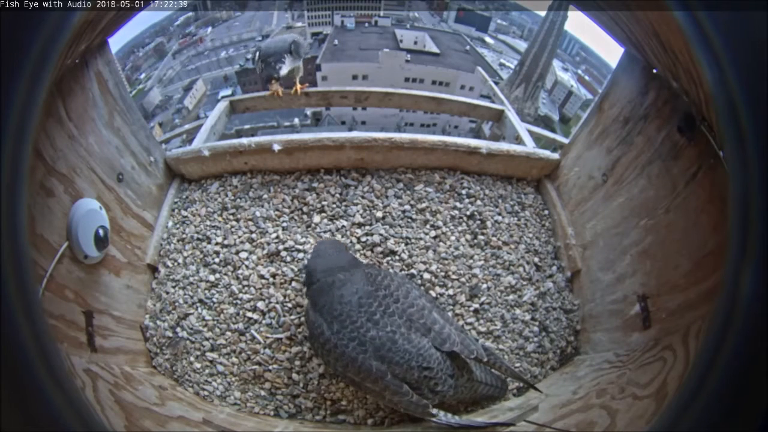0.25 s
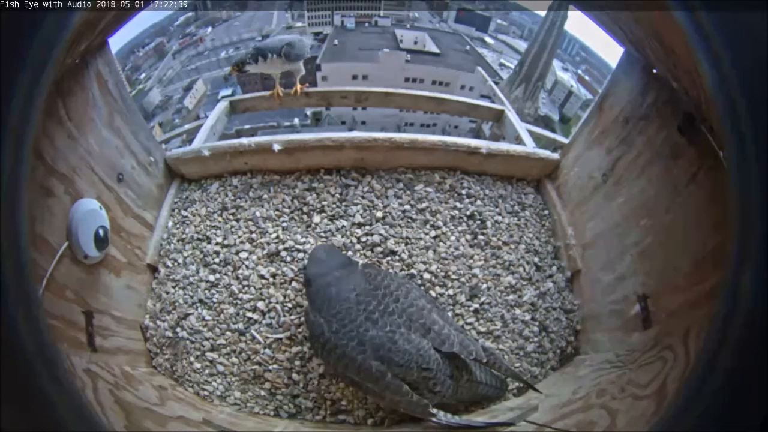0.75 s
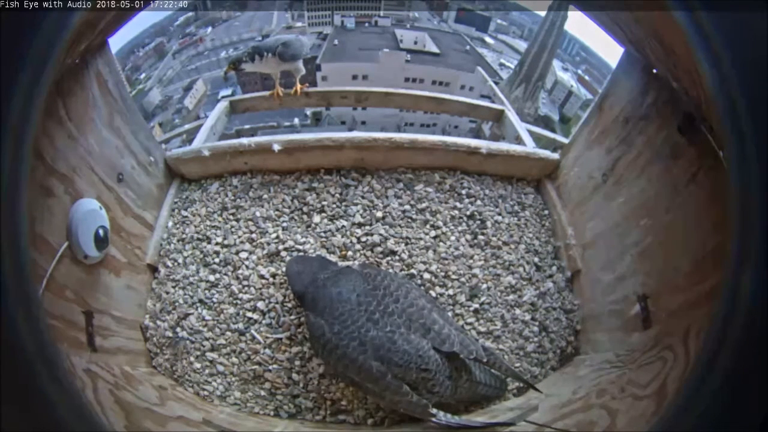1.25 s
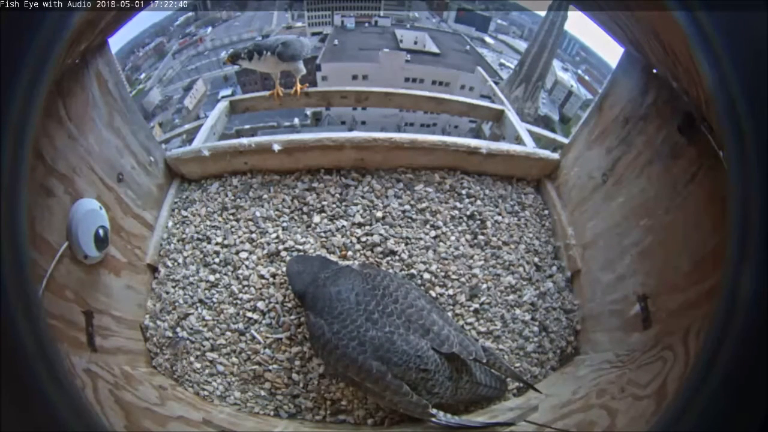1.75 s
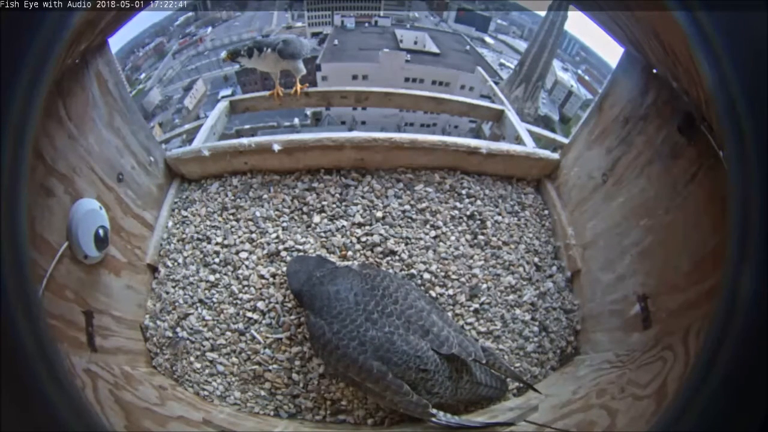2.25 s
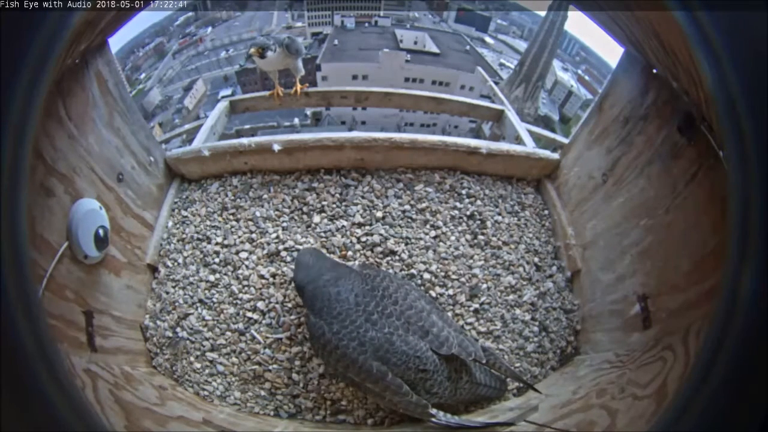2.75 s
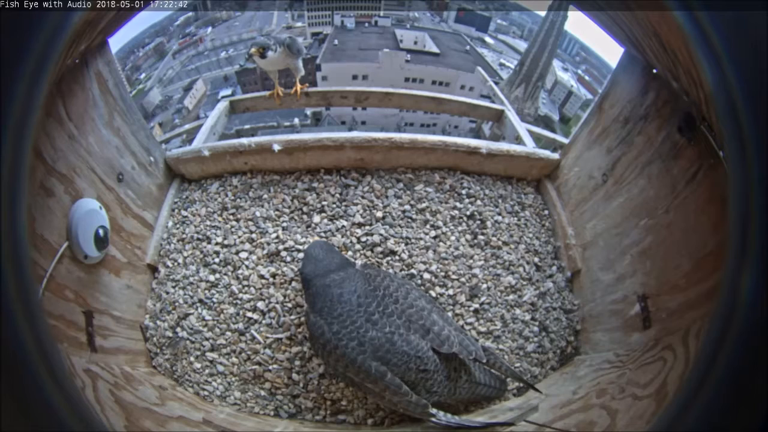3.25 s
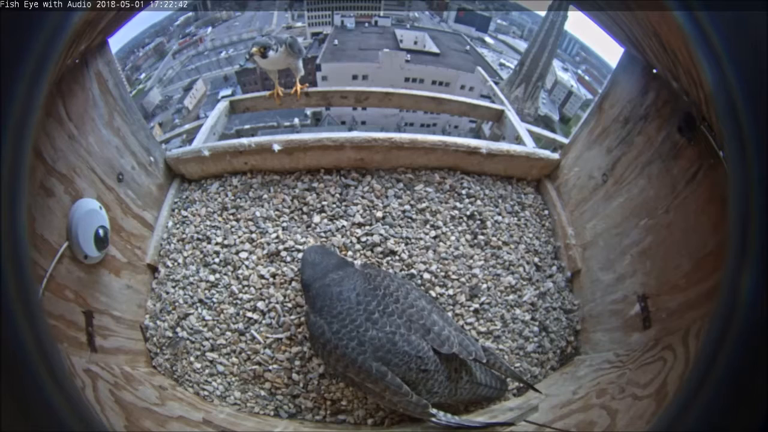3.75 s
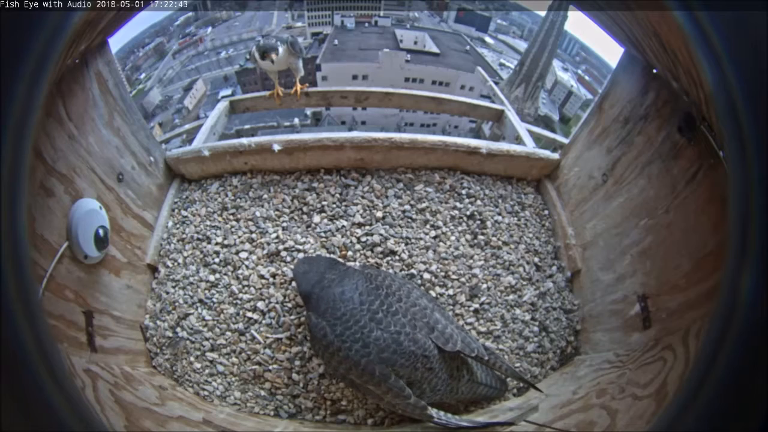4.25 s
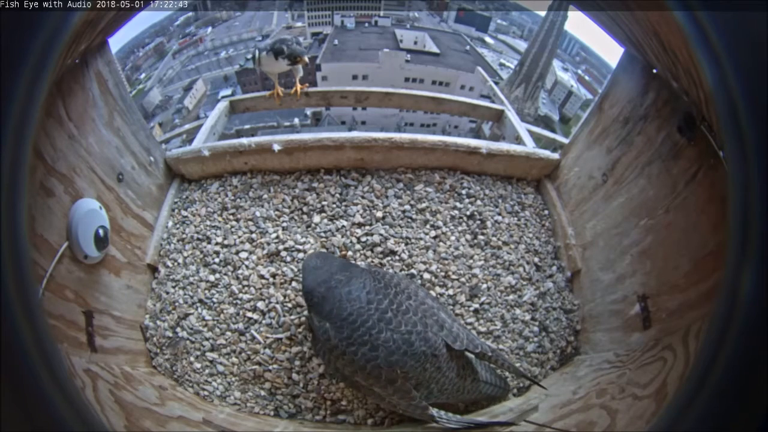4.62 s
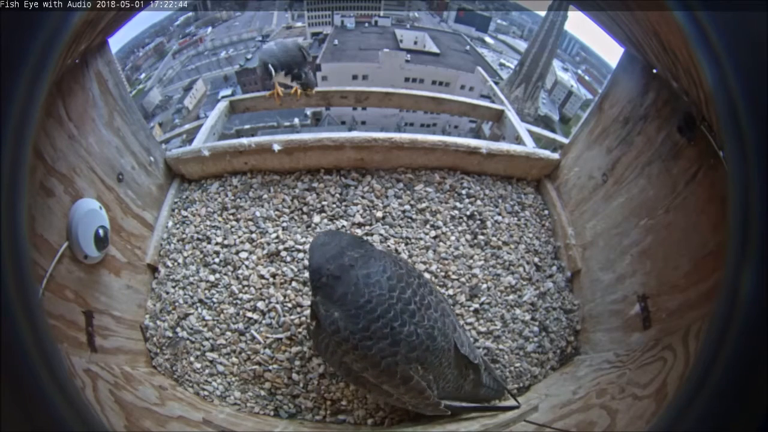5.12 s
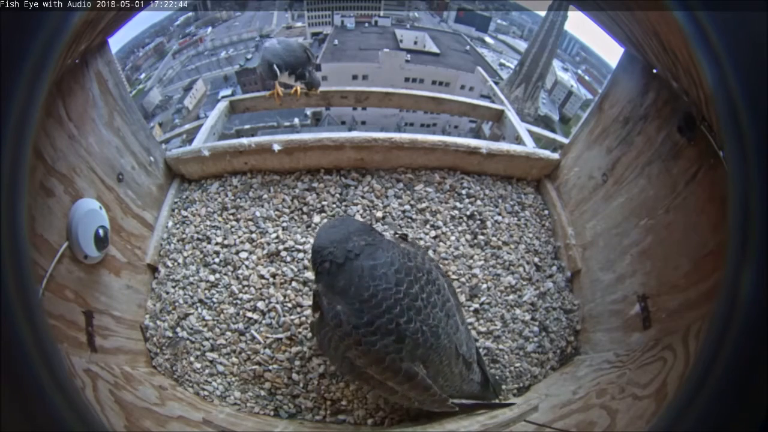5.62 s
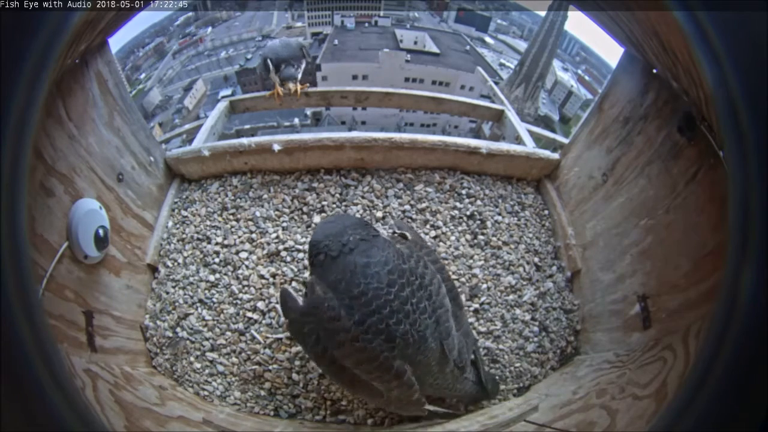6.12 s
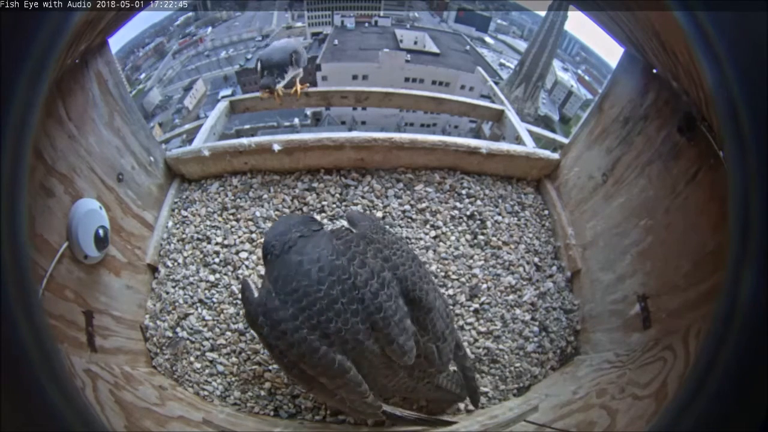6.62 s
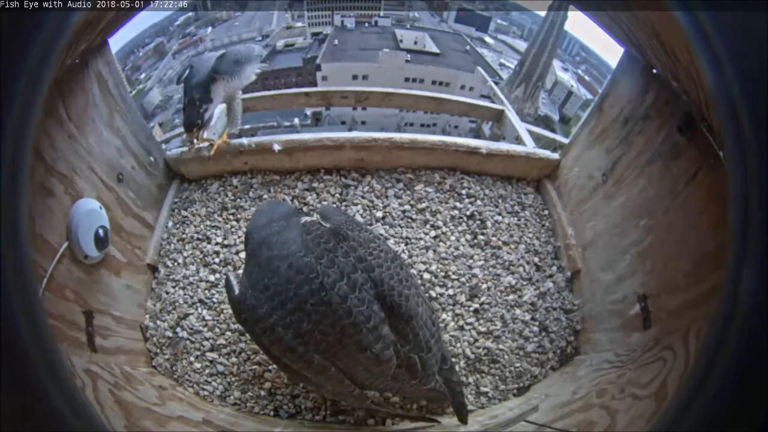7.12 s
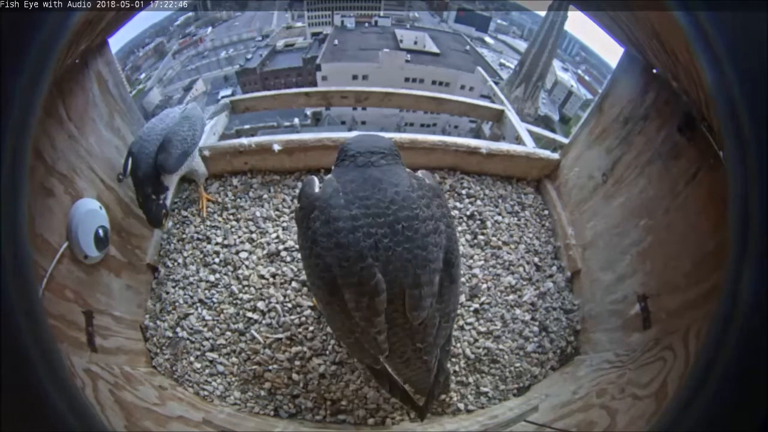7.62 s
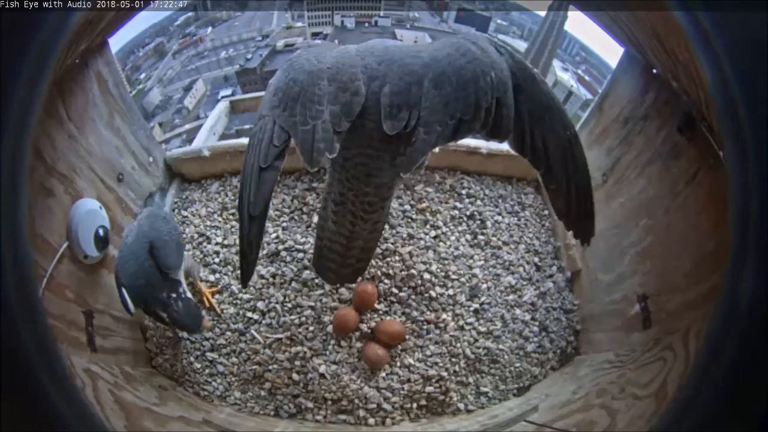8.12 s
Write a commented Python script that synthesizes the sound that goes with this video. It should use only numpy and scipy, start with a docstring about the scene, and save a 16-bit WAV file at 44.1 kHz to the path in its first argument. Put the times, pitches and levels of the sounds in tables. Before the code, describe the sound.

Raspy falcon clucks and sharp chirps, spaced at first, build into piercing, overloaded squeals in a small box above faint traffic roar.

```python
"""Two falcons greet in a wooden nest box on a tall building, over a city roar of coloured noise and engine tones.
Clucks (pulsed overtone stacks), short chirps and harsh rasps of puffed noise begin at once; the first held
whistle, a few gliding partials, comes half a second in. Feathers rustle as grainy noise from about 3 s, and
two pebbles tick near 4 and 4.7 s. From about 5.2 s whistles also break up to 6-7 kHz, on to the end.
A close, narrow-band camera microphone overloads on the loudest notes."""
import sys
import numpy as np
from scipy import signal
from scipy.fft import rfft, irfft, next_fast_len
from scipy.io import wavfile
from scipy.ndimage import map_coordinates

SR = 44100
rng = np.random.default_rng(int(sys.argv[2]) if len(sys.argv) > 2 else 0)


def generate_wav(sig):
    """Save sig (samples, or channels by samples) to the path in sys.argv[1] as 16-bit PCM at SR."""
    pcm = np.round(np.clip(np.atleast_2d(sig).T, -1, 1) * 32767).astype(np.int16)
    wavfile.write(sys.argv[1], SR, pcm)


N = 369116  # length in samples
BAND_HZ, TOP_HZ = 7750, 16000  # microphone band edge, top of the finished sound


def amp(db):
    """Decibels to gain."""
    return 10 ** (np.asarray(db) / 20)


def unit(x):
    """Scaled to rms 1."""
    return x / np.sqrt(np.mean(x ** 2) + 1e-20)


def along(points, hz):
    """Levels read from (frequency_hz, level_db) points on a log frequency axis."""
    point_hz, level_db = np.transpose(points)
    return np.interp(np.log(hz + 1), np.log(point_hz + 1), level_db)


def curves(rows, t):
    """Each column after the time, read at times t."""
    times, *columns = np.transpose(rows)
    return [np.interp(t, times, column) for column in columns]


def wobble(rate, size=N):
    """A smooth random curve, rate knots a second."""
    knots = rng.standard_normal(max(int(size * rate / SR) + 4, 600))
    return map_coordinates(knots, [np.arange(size) * rate / SR])


def filtered(x, response):
    """x times a response of frequency, padded so that its end does not wrap round."""
    padded = next_fast_len(N + SR // 2)
    hz = np.fft.rfftfreq(padded, 1 / SR)
    return irfft(rfft(x, padded) * response(hz), padded)[:N]


def hiss(spectrum, puffs=1):
    """Coloured noise of rms 1; puffs modulates the air before it is coloured."""
    air = puffs * rng.standard_normal(N)
    return unit(filtered(air, lambda hz: amp(along(spectrum, hz))))


def note(rows, attack, release, jitter):
    """Start sample, pitch, levels, phase and on-off gate of one note; the pitch trembles by the share jitter."""
    start, stop = max(rows[0][0], 0), rows[-1][0]
    t = np.arange(start, stop + release, 1 / SR)
    pitch, *levels = curves(rows, t)
    trembling = pitch * (1 + jitter * wobble(300, size=len(t)))
    phase = 2 * np.pi * np.cumsum(trembling) / SR
    fade_in = np.clip((t - start) / attack, 0, 1)
    fade_out = np.clip((stop + release - t) / release, 0, 1)
    gate = np.sqrt(2) * fade_in * fade_out  # a sine of gain 1 then has rms 1
    return round(start * SR), pitch, levels, phase, gate


def shaped(start, first, second, pitch_hz, partials_db, peak_s, swell_db, fade_db):
    """Rows (time_s, pitch_hz, level_db per partial) of a note whose pitch turns once and level peaks once."""
    times = [start, start + first, start + first + second]
    at = np.sort([*times, peak_s + 1e-6])  # the nudge keeps a peak at the turn distinct
    shape_db = np.interp(at, [start, peak_s, times[2]], [-swell_db, 0, -fade_db])
    levels_db = shape_db[:, None] + np.array(partials_db)
    return np.column_stack([at, np.interp(at, times, pitch_hz), levels_db])


def whistled(notes):
    """Nearly pure partials; each flickers on its own and a fast tremble spreads a rough halo round it."""
    out = np.zeros(N + SR)
    for rows in notes:
        at, pitch, levels, phase, gate = note(rows, attack=.0025, release=.003, jitter=.006)
        size = len(gate)
        rough = pitch / 35000 + .3 * np.exp(-size / SR / .05)  # high and short forced notes are hoarser
        for k, db in enumerate(levels, 1):
            flicker = amp(2.0 * wobble(120, size=size)) + rough * wobble(700, size=size)
            in_band = k * pitch < BAND_HZ + 400
            out[at:][:size] += gate * amp(db) * flicker * np.sin(k * phase) * in_band
    return out[:N]


# Held whistles: start_s, to_turn_s, after_turn_s, start_hz, turn_hz, end_hz,
# then level_db of each partial (rms at the loudest point, before flicker)
WHISTLE_NOTES = [ (.487, .055, .103, 1860, 1765, 1920, -22, -37, -27, -30),
                 (.645, .025, .01, 3110, 3440, 3020, -24, -26),
                 (1.205, .045, .105, 1886, 1855, 2060, -26, -22, -24, -33),
                 (1.345, .065, .015, 3170, 3345, 3020, -25, -23),
                 (1.788, .142, .025, 1690, 1846, 1990, -23, -31, -29, -35),
                 (2.998, .032, .15, 1890, 1755, 1890, -25, -36, -26, -34),
                 (4.24, .075, .015, 1680, 1960, 1560, -25, -31, -30, -29),
                 (4.33, .012, .013, 1545, 1420, 1295, -26),
                 (4.735, .035, .025, 2139, 2136, 1977, -17, -24, -35),
                 (5.33, .08, .02, 1650, 2033, 2050, -25, -34, -32, -33),
                 (5.725, .035, .065, 2303, 2133, 2323, -22, -23, -29),
                 (5.887, .015, .018, 794, 805, 819, -59, -26, -31, -33, -27, -24),
                 (6.315, .02, .02, 2707, 2698, 2660, -25, -12), (6.34, .01, .01, 4470, 4150, 3830, -22),
                 (6.34, .01, .01, 7200, 6880, 6570, -18), (6.476, .014, .02, 3620, 4420, 4390, -28),
                 (6.48, .02, .02, 6010, 5950, 5890, -34), (6.512, .028, .02, 4290, 4780, 4700, -26),
                 (7.033, .018, .019, 6010, 5975, 5940, -19), (7.085, .012, .013, 7400, 7500, 7600, -28),
                 (7.473, .008, .009, 6150, 6195, 6240, -22), (7.53, .07, .06, 3560, 4200, 4350, -23, -45),
                 (7.64, .01, .012, 4300, 4400, 4500, -22), (8.32, .01, .038, 3860, 4240, 4100, -24), ]
WAIL_PEAK_SHARE, WAIL_SWELL_DB, WAIL_FADE_DB = .3, 4, 7  # loudest this far in; softer by these at start and end


def wails():
    """Held whistles whose pitch bends once while the level peaks early in their length."""
    notes = []
    for start, first, second, *rest in WHISTLE_NOTES:
        peak_s = start + WAIL_PEAK_SHARE * (first + second)
        notes.append(shaped(start, first, second, rest[:3], rest[3:], peak_s, WAIL_SWELL_DB, WAIL_FADE_DB))
    return whistled(notes)


# Short forced chirps: start_s, rise_s, fall_s, start_hz, peak_hz, end_hz,
# then level_db of each partial (rms at the peak, before flicker)
CHIRP_NOTES = [ (.003, .027, .003, 1920, 1600, 1564, -19, -26, -25, -23),
               (.681, .003, .011, 1730, 1722, 1692, -11, -21, -5, -20),
               (1.423, .008, .009, 1888, 1876, 1830, -17, -14, -10, -19),
               (1.96, .003, .015, 1746, 1715, 1556, -13, -28, -17, -31),
               (2.715, .025, .02, 1862, 1940, 1496, -40, -28, -36, -28),
               (3.18, .014, .003, 1870, 1580, 1522, -18.5, -28, -28, -34),
               (3.44, .02, .03, 1910, 2115, 1970, -42, -32, -38),
               (3.648, .027, .015, 1728, 2084, 1773, -21, -28, -26, -30),
               (3.685, .003, .022, 1804, 1775, 1550, -18, -19, -15, -24),
               (3.88, .02, .03, 2015, 2090, 1760, -60, -28, -39, -35),
               (4.768, .003, .014, 3474, 3430, 3218, -14, -10),
               (4.8, .003, .022, 1684, 1630, 1260, -18, -31, -35), (5.19, .01, .01, 6320, 6320, 5900, -11),
               (5.2, .003, .02, 4100, 4020, 3500, -14.5, -20),
               (5.445, .003, .005, 2896, 2875, 2838, -11, -29),
               (5.45, .003, .017, 1781, 1780, 1770, -10, -22, -9, -12),
               (5.47, .003, .02, 1450, 1445, 1410, -18, -26),
               (5.612, .018, .03, 4270, 4480, 3380, -20, -34), (5.613, .003, .029, 5870, 5950, 6700, -18),
               (5.693, .003, .014, 1366, 1378, 1430, -19, -21),
               (5.805, .008, .02, 1943, 1800, 1742, -11, -20, -17, -23),
               (5.825, .015, .01, 6360, 6200, 6250, -10), (5.846, .013, .003, 6200, 6560, 6640, -3.5),
               (5.862, .004, .008, 7130, 6950, 6610, -5), (5.872, .008, .005, 6610, 6385, 6440, -1),
               (5.958, .003, .035, 6400, 6450, 6650, -24), (5.995, .005, .012, 4900, 3875, 3443, -4),
               (6.005, .012, .013, 2680, 2540, 2283, -10, -4, -20),
               (6.542, .035, .003, 6430, 6530, 6540, -18.5), (6.575, .01, .01, 3885, 3644, 3690, -13, -8),
               (6.585, .008, .017, 2464, 2300, 2266, -13, -4, -12),
               (6.878, .017, .06, 4400, 4450, 3350, -14, -22), (6.875, .012, .018, 6600, 6480, 6500, -13),
               (6.885, .003, .02, 2750, 2745, 2710, -35, -22), (6.89, .003, .007, 7270, 7160, 6900, -11.5),
               (7.0, .02, .04, 3700, 4350, 4700, -27), (7.112, .006, .012, 3790, 3735, 3560, -6, -5),
               (7.126, .003, .011, 2394, 2382, 2340, -12, -6, -11),
               (7.478, .027, .02, 4330, 4030, 3530, -14, -27), (7.648, .012, .03, 6150, 6350, 6550, -16),
               (7.7, .007, .009, 4010, 3900, 4126, -6, -26),
               (7.713, .008, .019, 2620, 2570, 2420, -30, -5, -14),
               (7.724, .003, .013, 4050, 3970, 3630, -8, -14), (8.07, .003, .017, 6230, 6090, 5300, -22),
               (8.088, .003, .009, 3770, 3715, 3550, -29, -31), (8.172, .02, .013, 6970, 6660, 5200, -12), ]
CHIRP_SWELL_DB = 8  # softer by this at the start
CHIRP_FADE_DB, CHIRP_FADE_DB_PER_S = 6, 330  # lost in the fall, and more the longer it lasts


def chirps():
    """Short forced whistles, loudest at the turn of their pitch."""
    notes = []
    for start, rise, fall, *rest in CHIRP_NOTES:
        fade_db = CHIRP_FADE_DB + CHIRP_FADE_DB_PER_S * fall
        notes.append(shaped(start, rise, fall, rest[:3], rest[3:], start + rise, CHIRP_SWELL_DB, fade_db))
    return whistled(notes)


CLUCK_SWELL_DB = 5  # gained by the fundamental over the hold
CLUCK_DROP_S, CLUCK_DROP_DB, OVERTONE_DROP_DB = .008, 13, 15  # the sudden loss when the hold ends
CLUCK_FADE_DB, OVERTONE_FADE_DB = 11, 16  # lost over the tail
CLUCK_TAIL_S, CLUCK_REST_HZ = .024, 390
CLUCK_WAVER = .15  # random spread of the pitch after the hold, as a share


def clucked(start, hold, start_hz, held_hz, low_db, high_db):
    """Rows (time_s, pitch_hz, fundamental_db, overtones_db): swell, sudden drop, wavering tail."""
    times = start + np.cumsum([0, hold, CLUCK_DROP_S, CLUCK_TAIL_S / 2, CLUCK_TAIL_S / 2])
    waver = 1 + CLUCK_WAVER * rng.standard_normal(3)
    pitch = [start_hz, held_hz, *(waver * [held_hz, CLUCK_REST_HZ, CLUCK_REST_HZ])]
    low = low_db - np.cumsum([0, CLUCK_DROP_DB, CLUCK_FADE_DB / 2, CLUCK_FADE_DB / 2])
    high = high_db - np.cumsum([0, 0, OVERTONE_DROP_DB, OVERTONE_FADE_DB / 2, OVERTONE_FADE_DB / 2])
    return np.column_stack([times, pitch, [low_db - CLUCK_SWELL_DB, *low], high])


# Low clucks: start_s, hold_s, start_hz, held_hz (at the end of the hold), fundamental_db, overtones_db
CLUCK_NOTES = [ (.033, .02, 371, 364, -13.5, -27), (.226, .03, 422, 547, -32, -15),
               (.413, .034, 305, 410, -12, -19), (.452, .015, 500, 390, -19, -34),
               (.69, .025, 429, 400, -14, -23), (1.138, .04, 310, 390, -12, -18),
               (1.975, .008, 357, 340, -12, -24), (2.926, .032, 323, 400, -10, -16),
               (2.972, .02, 500, 420, -21, -34), (3.195, .008, 362, 335, -19, -21),
               (3.705, .008, 391, 360, -15, -27), (4.33, .008, 384, 345, -18, -28),
               (4.71, .008, 298, 360, -20, -21), (4.805, .006, 380, 340, -23, -30),
               (5.167, .008, 379, 476, -36, -21), (5.465, .012, 500, 430, -16, -21),
               (5.69, .016, 316, 380, -17, -23), (5.83, .012, 460, 375, -19, -29),
               (6.26, .018, 357, 450, -25, -20), (6.29, .015, 372, 370, -28, -21),
               (6.605, .022, 489, 400, -22, -26), (6.852, .012, 410, 460, -20, -19),
               (7.14, .022, 551, 420, -21, -28), (7.45, .008, 357, 400, -18, -25),
               (7.738, .005, 438, 380, -23, -28), (8.04, .018, 371, 480, -20, -22),
               (8.148, .015, 370, 500, -18, -20), ]
# Colour of the cluck's overtones: frequency_hz, relative_level_db
CLUCK_COLOUR = [(700, 0), (1000, -5), (1300, 0), (1750, -1), (2150, -13), (3600, -28), (4700, -17),
                (5800, -30), (6800, -22)]


def clucks():
    """Slow flaps of the membranes: a round fundamental under a pulsed stack of overtones."""
    out = np.zeros(N + SR)
    k = np.arange(2, 20)[:, None]  # overtone numbers
    for row in CLUCK_NOTES:
        at, pitch, (low_db, high_db), phase, gate = note(clucked(*row), attack=.007, release=.006, jitter=.02)
        shares = amp(along(CLUCK_COLOUR, k * pitch)) * (k * pitch < BAND_HZ)
        stack = np.sum(shares * np.sin(k * phase), axis=0) / np.sqrt(np.sum(shares ** 2, axis=0))
        uneven = amp(3 * wobble(250, size=len(gate)))
        fundamental = amp(low_db) * np.sin(phase)
        out[at:][:len(gate)] += gate * (fundamental + amp(high_db) * uneven * stack)
    return out[:N]


RASP_RANGE_DB = 42  # climbed in the rise, lost in the fall
THROAT_LINGERS = 1.6  # the throat's fall over the beak's
# Bursts of air rasping through the syrinx: peak_s, rise_s, fall_s (of the beak), throat_db, beak_db
RASP_BURSTS = [ (.024, .06, .06, -19.5, -25.5), (.236, .028, .014, -16, -18), (.258, .04, .03, -30, -25),
               (.428, .024, .06, -24, -35), (.664, .3, .03, -43, -35), (.692, .05, .055, -22, -22),
               (1.16, .036, .04, -28, -25.5), (1.412, .22, .02, -36, -24), (1.432, .04, .034, -24, -12),
               (1.796, .04, .1, -64, -41), (1.98, .11, .032, -26.5, -26.5), (2.948, .03, .06, -24, -30),
               (2.985, .1, .04, -40, -33), (3.184, .2, .05, -39, -32), (3.468, .04, .06, -48, -34.5),
               (3.688, .05, .045, -30, -19), (3.912, .045, .055, -48.5, -37), (4.325, .1, .06, -27, -21),
               (4.716, .02, .02, -36, -42), (4.784, .12, .055, -20.5, -14), (5.176, .02, .02, -24, -25),
               (5.436, .17, .02, -45, -25.5), (5.468, .06, .04, -24, -26), (5.64, .05, .065, -31.5, -24.5),
               (5.7, .025, .035, -18.5, -32), (5.808, .2, .05, -35, -22.5), (5.888, .25, .04, -25.5, -14),
               (6.008, .022, .04, -32, -8), (6.028, .04, .025, -23, -13), (6.324, .075, .09, -24, -22.5),
               (6.356, .03, .035, -36.5, -24), (6.52, .14, .08, -51, -36), (6.596, .032, .05, -18.5, -5.5),
               (6.864, .018, .018, -18, -23.5), (7.012, .035, .1, -45, -33), (7.14, .035, .04, -15, -8.5),
               (7.46, .02, .06, -24, -25), (7.608, .1, .12, -51.5, -32.5), (7.712, .032, .05, -50.5, -23),
               (7.74, .04, .035, -19.5, -21), (8.052, .022, .025, -23, -24), (8.16, .022, .04, -22, -21),
               (8.325, .026, .3, -48, -32), ]
# Throat colour of the air noise: frequency_hz, relative_density_db
THROAT_COLOUR = [(250, -20), (600, -3), (1000, 1), (2000, 1.5), (3200, -3.5), (4000, -41.5)]
# Beak colour of the air noise: frequency_hz, relative_density_db
BEAK_COLOUR = [(2600, -32.5), (3300, 2), (4000, -1.5), (4500, -18.5), (5000, 1), (7000, 3.5), (7600, -7.5)]


def rasp():
    """Turbulent air in coarse puffs that throat and beak share, each with its own colour."""
    t, throat, beak = np.arange(N) / SR, np.zeros(N), np.zeros(N)

    def burst(peak, rise, fall):
        """Gain climbing to 1 and falling again, straight in decibels."""
        return amp(-RASP_RANGE_DB * np.maximum((peak - t) / rise, (t - peak) / fall))

    for peak, rise, fall, throat_db, beak_db in RASP_BURSTS:
        throat += amp(throat_db) * burst(peak, rise, THROAT_LINGERS * fall)
        beak += amp(beak_db) * burst(peak, rise, fall)
    puffs = amp(3.5 * wobble(350))
    return throat * hiss(THROAT_COLOUR, puffs) + beak * hiss(BEAK_COLOUR, puffs)


def box(x):
    """The plywood walls answer with a short dense tail, and the air in the box rings at one low note."""
    t = np.arange(SR // 8) / SR
    tail = rng.standard_normal(len(t)) * amp(-60 * t / .045)  # 60 dB down in 45 ms
    walls = signal.fftconvolve(x, tail / np.linalg.norm(tail))[:N]
    wet = x + amp(-13) * walls
    mode_hz, width_hz = 375, 50

    def air_mode(hz):
        """The direct sound plus half a resonance."""
        loss = 1j * hz * width_hz
        return 1 + 0.5 * loss / (mode_hz ** 2 - hz ** 2 + loss)

    return filtered(wet, air_mode)


# Feathers shifting: time_s, level_db (before the grain)
FEATHER_LEVEL = [(3.2, -74), (3.4, -55), (5.3, -57.5), (6.1, -54.5), (6.9, -63), (7.3, -76.5)]


def feathers():
    """Feathers rustle as bright noise in uneven grains, slow swells and quick ones together."""
    level_db, = curves(FEATHER_LEVEL, np.arange(N) / SR)
    grain_db = 2.7 * wobble(6.2) + 3 * wobble(120)
    colour = [(3000, -31), (5000, -4), (6500, 2.5), (7600, -5.5)]  # frequency_hz, relative_density_db
    return amp(level_db + grain_db) * hiss(colour)


# Gravel ticks: start_s, level_db (of the decay at its start)
PEBBLE_TICKS = [(3.9789, -35), (4.664, -32)]


def pebbles():
    """Pebbles tick: a 6 kHz tone times noise, dying 60 dB in 13 ms."""
    out = np.zeros(N)
    t = np.arange(SR // 50) / SR
    for start, db in PEBBLE_TICKS:
        decay = amp(db - 60 * t / 0.013)
        out[round(start * SR):][:len(t)] += decay * np.sin(2 * np.pi * 6000 * t) * rng.standard_normal(len(t))
    return out


# Engine tones of passing traffic: start_s, length_s, start_hz, middle_hz, end_hz, level_db (before it wavers)
ENGINE_TONES = [(.01, .7, 121, 131, 140, -39), (.3, .95, 217, 208, 199, -42),
                (1.4, 1.4, 125, 133, 121, -41), (1.5, 1.4, 58, 52, 45, -43.5), (1.5, 1, 215, 209, 203, -43),
                (3.35, .65, 160, 168, 137, -43), (6.5, 1, 141, 175, 139, -44.5)]


def engines():
    """Single gliding tones, unsteady in pitch and level, that come and go."""
    out = np.zeros(N)
    for start, length, *pitch_hz, level in ENGINE_TONES:
        rows = [(start + length * k / 2, hz, level) for k, hz in enumerate(pitch_hz)]
        at, _, (db,), phase, gate = note(rows, attack=.08, release=.05, jitter=.015)
        unsteady = amp(db + 4.0 * wobble(8, size=len(gate)))
        out[at:][:len(gate)] += gate * unsteady * np.sin(phase)
    return out


# Colour of the city roar: frequency_hz, relative_density_db
CITY_COLOUR = [(12, -11.5), (50, -1), (105, -1.5), (230, -10), (285, -20.5), (370, -17), (550, -26.5),
               (1000, -20), (1900, -33.5), (2600, -44), (4500, -52), (7600, -67)]
# Loudness of the city roar: time_s, level_db (before it wavers)
CITY_LEVEL = [(0, -34.5), (8.37, -38)]


def city_roar():
    """Distant traffic blurs into broad noise, heaviest in the bass, that wavers slowly."""
    level_db, = curves(CITY_LEVEL, np.arange(N) / SR)
    return amp(level_db + .8 * wobble(2)) * hiss(CITY_COLOUR)


def scene():
    """Both birds in the box, over nest and city."""
    birds = box(wails() + chirps() + clucks() + rasp())
    nest = feathers() + pebbles()
    city = engines() + city_roar()
    return (birds + nest + city)[None]


def record(dry):
    """The microphone stage saturates and passes a narrow band; peaks past full scale clip and spill above it."""
    squeezed = dry[0] / (1 + np.abs(dry[0] / 1.1) ** 6) ** (1 / 6)  # levels off towards 1.1
    narrow = filtered(squeezed, lambda hz: 1 / (1 + (hz / BAND_HZ) ** 60))
    offset = narrow + .0085  # small constant offset
    return filtered(np.clip(offset, -1, 1), lambda hz: hz < TOP_HZ)[None]


dry = scene()
out = record(dry)
generate_wav(out)
```